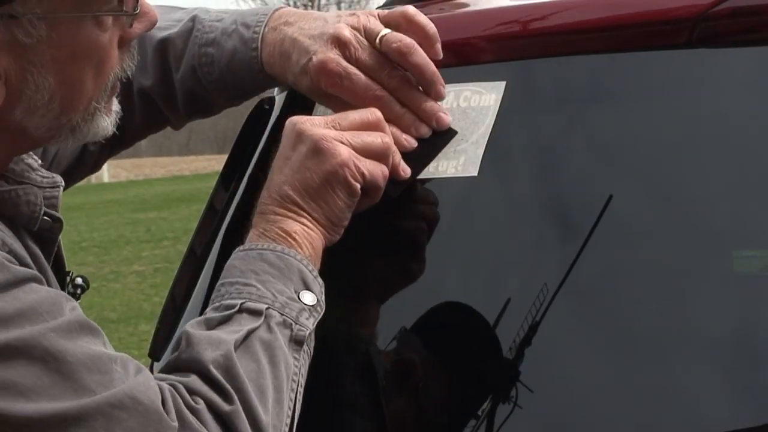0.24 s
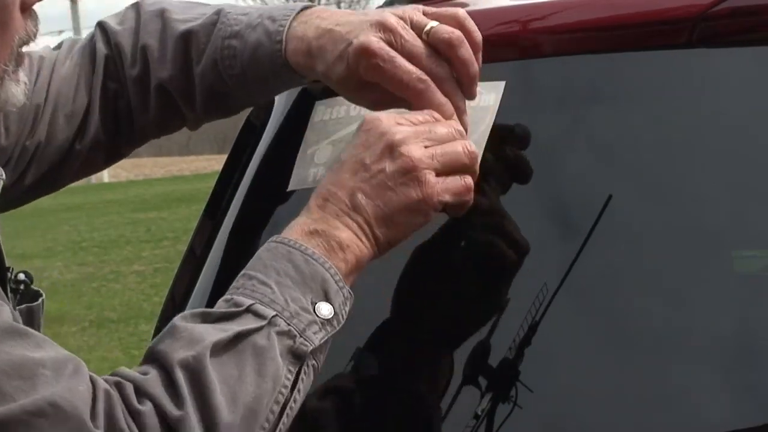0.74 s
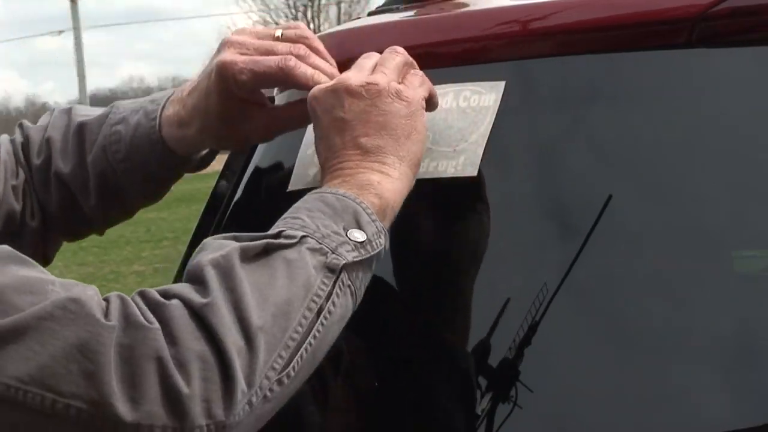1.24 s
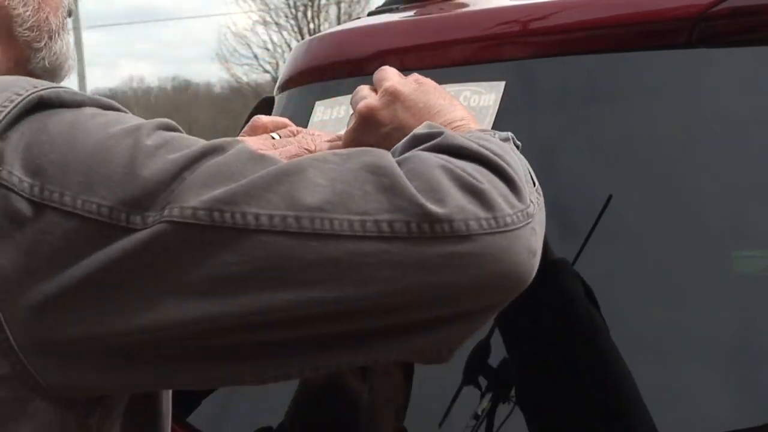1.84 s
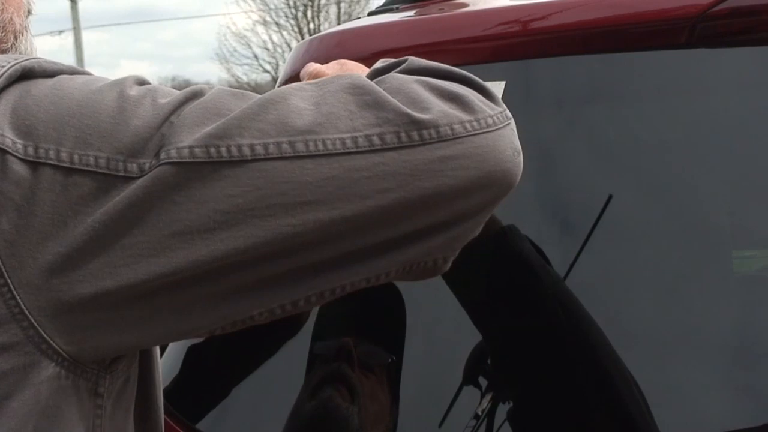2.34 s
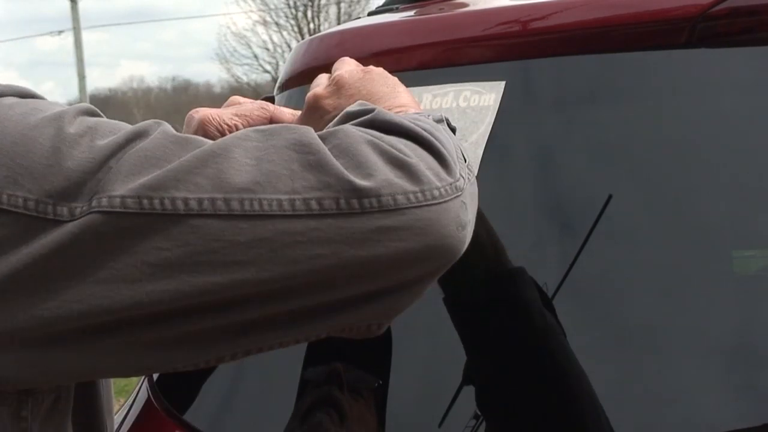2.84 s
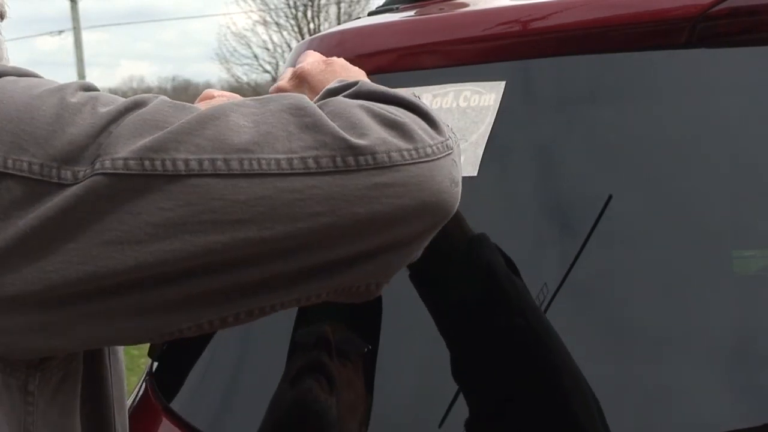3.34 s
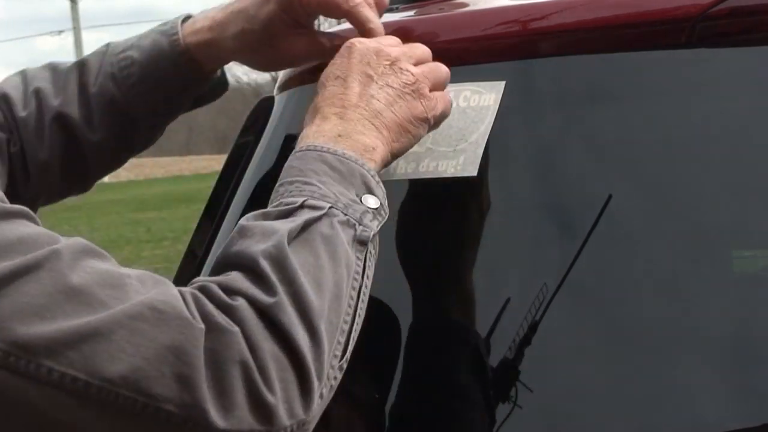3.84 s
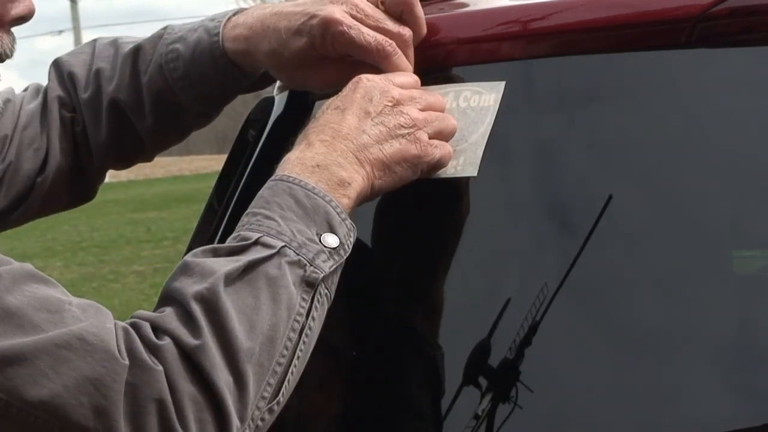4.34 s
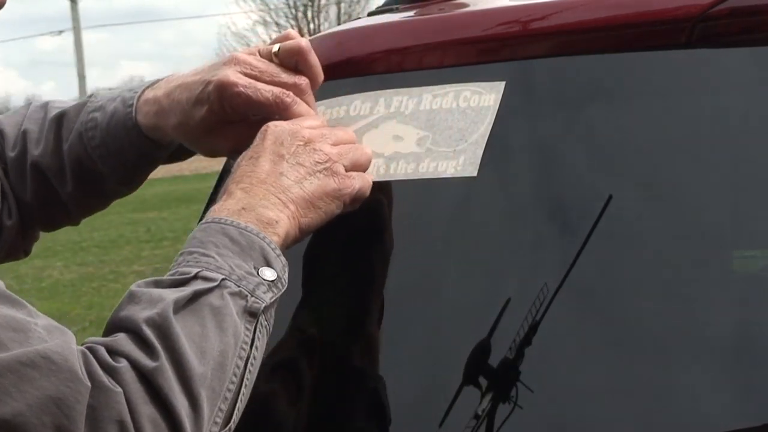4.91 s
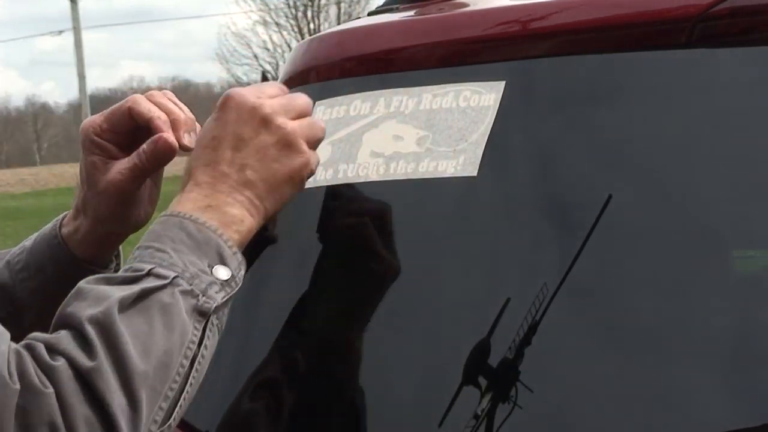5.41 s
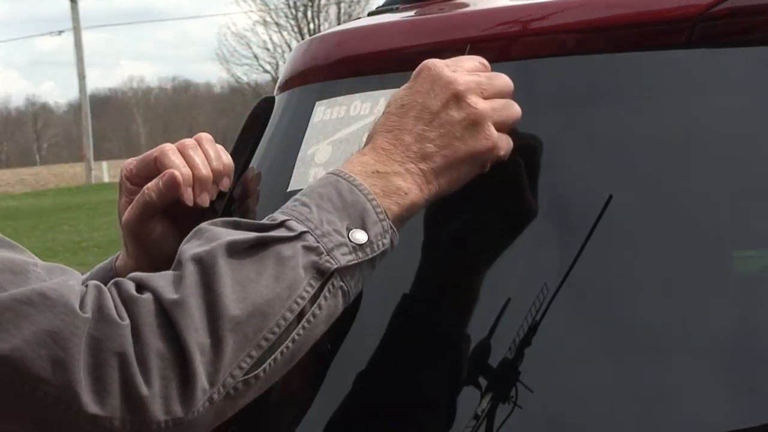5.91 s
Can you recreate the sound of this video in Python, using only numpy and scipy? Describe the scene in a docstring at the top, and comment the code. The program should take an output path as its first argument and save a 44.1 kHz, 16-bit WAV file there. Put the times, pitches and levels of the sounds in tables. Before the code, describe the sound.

Close, dry rubbing of a hard blade on a car window, with sleeve rustles, knocks, and a final harsh rasp and thud.

```python
"""Smoothing a decal onto a car window

A plastic squeegee smooths a vinyl decal onto a car's rear window, outdoors on a calm day.
The blade sticks and slips: random bursts of tiny pushes drum the pane, and finer grains make the edge hiss.
Sleeves and fingers brush between strokes, as noise that swells and fades. The blade is set down with knocks.
One last hard stroke crackles across the decal in coarse grains and snaps off its edge.
"""
import sys
import numpy as np
from scipy import signal
from scipy.fft import rfft, irfft
from scipy.io import wavfile
from scipy.ndimage import uniform_filter1d, minimum_filter1d, map_coordinates

SR = 44100
rng = np.random.default_rng(int(sys.argv[2]) if len(sys.argv) > 2 else 0)


def dump_mix(stems):
    """Bounce the given channels to the path in sys.argv[1] as a 16-bit WAV at rate SR."""
    frames = np.atleast_2d(stems).T  # one column per channel
    limited = np.clip(frames, -1, 1)  # hard clip at full scale
    pcm = np.round(limited * 32767).astype(np.int16)
    wavfile.write(sys.argv[1], SR, pcm)


N = 271876

TIME = np.arange(N) / SR  # seconds
TAPS = 8192  # length of each impulse response, in samples
BINS = np.maximum(np.arange(TAPS // 2 + 1) * SR / TAPS, 1)  # frequencies of a gain curve, in Hz

# Levels in the tables are relative: the functions that play them set the final balance.


# the first, slow stroke: [t/s, pane drumming level/dB, edge hiss level/dB, fine treble hiss level/dB]
FIRST_STROKE = [(0.06, -48, -55, -68), (0.122, -28, -51, -61), (0.152, -38, -50, -61),
                (0.214, -23, -48, -59), (0.24, -31.5, -48, -60), (0.32, -19.5, -43.5, -54),
                (0.362, -26, -50.5, -60), (0.57, -28.5, -45, -52), (0.598, -32.5, -59, -71),
                (0.66, -48, -62, -73)]
# colour of its edge hiss: [f/Hz, level/dB]
FIRST_EDGE = [(310, -38), (520, 2.5), (595, -5.5), (622, -14), (831, -8), (1040, -18), (1120, -16.5),
              (1420, -17.5), (2220, -19.5), (2680, -19), (3800, -25), (5550, -24), (7500, -34.5),
              (9750, -62), (16500, -120)]


def first_stroke():
    """The slow opening stroke, with the pane's higher modes held back."""
    return smoothing(FIRST_STROKE, FIRST_EDGE, tilt_db=-6.5, rumble_db=-22)


# quick strokes with the elbow raised: [start t/s, length t/s, pane drumming level/dB,
# edge hiss level/dB, fine treble hiss level/dB, lifted band of the edge hiss f/Hz]
SHORT_STROKES = [(1.772, 0.29, -33, -48, -64.5, 3600), (2.068, 0.17, -29, -44, -59, 2480),
                 (2.245, 0.34, -29.5, -45, -57, 4700), (3.019, 0.15, -31, -46.5, -60, 4600),
                 (3.18, 0.14, -32.5, -49.5, -60.5, 4600), (3.335, 0.15, -34.5, -52.5, -66, 3200),
                 (3.462, 0.16, -35, -52.5, -67, 3270)]
# colour of their edge hiss: [f/Hz, level/dB]
SHORT_EDGE = [(530, -30), (900, 0), (983, 4.5), (1070, -6), (1240, 0), (1590, -4.5), (2020, -7.5),
              (2300, 0.5), (2680, -6.5), (4030, -6.5), (5260, -10.5), (6570, -20.5), (7500, -24),
              (9750, -34), (16500, -120)]
# time to build pressure, its slow sag, time to let go
PRESS_S, SAG_DB_PER_S, LIFT_S = 0.049, 8.5, 0.062


def quick_strokes():
    """Drumming, rumble and hiss of a quick stroke all follow one press, sag and lift."""
    pane_sound = judder(1, undb(-11.5), tilt_db=7)
    treble = vinyl_hiss(hz=8500, lift=0.54)
    out = 0
    for s, length, drum_db, hiss_db, fine_db, hz in SHORT_STROKES:
        age = np.clip(TIME - s, 0, length)
        press_and_lift = np.minimum(np.minimum(age / PRESS_S, (length - age) / LIFT_S), 1)
        pressure = press_and_lift ** 1.07 * undb(-SAG_DB_PER_S * age)
        lifted_band = 1 + 0.46 * resonances([(hz, 1100, 0)])
        edge = edge_hiss(colour(SHORT_EDGE) * lifted_band)
        stroke = undb(drum_db) * pane_sound + undb(hiss_db) * edge + undb(fine_db) * treble
        out = out + pressure * stroke
    return out


# the long stroke out to the side: [t/s, pane drumming level/dB, edge hiss level/dB, fine treble hiss level/dB]
LONG_STROKE = [(4.245, -45, -57, -75), (4.279, -23, -37, -50.5), (4.339, -37, -52, -70),
               (4.371, -20, -33, -50.5), (4.425, -25, -47, -60), (4.533, -34, -50, -65),
               (4.623, -16.5, -38, -51), (4.701, -25, -47, -60), (4.807, -18, -42, -54),
               (4.907, -32.5, -54, -69), (4.941, -24, -45, -56), (5.023, -31.5, -49, -63),
               (5.067, -28, -55.5, -68), (5.12, -45, -62, -75)]
# colour of its edge hiss: [f/Hz, level/dB]
LONG_EDGE = [(350, -21), (600, -23), (646, -10), (711, 0), (916, -10), (1130, -10.5), (1590, -18),
             (1920, -14.5), (2200, -8.5), (2470, -9.5), (3020, -19.5), (3220, -16), (3500, -18),
             (5400, -21), (7500, -34.5), (9750, -61), (16500, -120)]


def long_stroke():
    """The long stroke out to the side, with more of the pane's higher modes than the first."""
    return smoothing(LONG_STROKE, LONG_EDGE, tilt_db=-2.0, rumble_db=-19.5)


# the last hard stroke: [t/s, pane drumming level/dB, edge rasp level/dB, fine treble hiss level/dB]
HARD_STROKE = [(5.685, -25.5, -39, -54), (5.743, -31.5, -36.5, -46), (5.777, -26, -24.5, -32),
               (5.803, -27, -24, -30.5), (5.843, -29.5, -33.5, -47.5), (5.905, -21, -22.5, -34),
               (6.009, -30, -38.5, -50), (6.031, -28, -36.5, -52), (6.049, -35, -27.5, -36),
               (6.066, -26.5, -26, -30)]
# resonances of the hard-pressed plastic blade: [f/Hz, width f/Hz, level/dB]
BLADE = [(658, 145, 0.5), (1094, 1020, -1.5), (1950, 530, -0.5), (2320, 490, -2), (3600, 1300, -6.5),
         (4370, 1040, -7), (5490, 1480, -10.5), (10100, 6400, -20)]


def scraping():
    """Pressed hard, the edge rasps in coarse grains that ring the plastic, with sharper cracks among them."""
    drum, hiss, fine = follow(HARD_STROKE)
    chatter = undb(2.4 * walk(rate=330))
    # two parts of the edge take turns in gripping, each with a slightly different stiffness
    grip = .5 + .5 * np.tanh(1.7 * walk(rate=30))
    rasp = 0
    for share, stiff in [(grip, .97), (1 - grip, 1.03)]:
        modes = [(hz * stiff, width, db) for hz, width, db in BLADE]
        rasp = rasp + np.sqrt(share) * ring(chatter * grains(rate=2600, spread_db=1.0), resonances(modes))
    cracks = ring(grains(rate=140, spread_db=2.5), resonances(BLADE))
    treble = ring(chatter * grains(rate=8000, spread_db=2.5), colour(FINE))
    surface = hiss * (undb(-3) * rasp + undb(-8) * cracks) + undb(-1.5) * fine * treble
    return judder(drum, undb(-16) * drum, tilt_db=3) + surface


def smoothing(stroke, edge_colour, tilt_db, rumble_db):
    """A slow stroke: edge and vinyl hiss, and the body's rumble follows the drumming of the pane."""
    drum, hiss, fine = follow(stroke)
    surface = undb(0.2) * hiss * edge_hiss(colour(edge_colour)) + fine * vinyl_hiss(hz=10200, lift=0.3)
    return judder(drum, undb(rumble_db) * drum, tilt_db) + surface


# resonances of the car body: [f/Hz, width f/Hz, level/dB]
BODY = [(43, 20, -3), (75, 43, 3.5), (135, 100, -16)]


def judder(drum, rumble, tilt_db):
    """Stick-slip of the blade comes in short bursts that drum the pane and shake the car body."""
    glass = even(ring(grains(rate=260, spread_db=3.0), pane(tilt_db)), seconds=0.015)
    bursts = unit(undb(2.2 * walk(rate=90)))
    body = even(ring(grains(rate=240, spread_db=4.5), resonances(BODY)), seconds=0.056)
    return undb(-0.5) * drum * bursts * glass + undb(1.0) * rumble * body


# resonances of the window pane: [f/Hz, width f/Hz, level/dB]
PANE = [(154, 17.6, -11), (229.6, 50.3, 1.5), (264.7, 63, -3.5), (321, 118, -10), (361.6, 62, -9.5),
        (438.4, 79, -15), (677, 330, -28), (1140, 410, -67)]


def pane(tilt_db):
    """Gain of the pane; where it is touched favours lower or higher modes (dB per octave, up to 350 Hz)."""
    return resonances([(hz, width, db + tilt_db * np.log2(min(hz, 350))) for hz, width, db in PANE])


def edge_hiss(gain):
    """Fine grains hiss from the gliding edge with a random flutter; rms 1 from 1.5 to 6 kHz."""
    flutter = undb(0.93 * walk(rate=120))
    direct = ring(flutter * grains(rate=9000, spread_db=1.5), gain)
    edge = reflect(direct, share=0.33, lag=0.000691, drift=0.13)
    band = signal.butter(4, [1500, 6000], "band", fs=SR, output="sos")
    return edge / signal.sosfilt(band, edge).std()


def reflect(x, share, lag, drift):
    """The hand over the blade throws the hiss back; as it moves, the bands of colour glide."""
    late = np.arange(N) - SR * lag * np.exp(drift * walk(rate=6))
    return unit(x + share * map_coordinates(x, [late], order=3))


# colour of the finest vinyl hiss: [f/Hz, level/dB]
FINE = [(6000, -29), (7400, -8.5), (8700, 1), (10300, -1), (12000, -2.5), (15300, -11.5)]


def vinyl_hiss(hz, lift):
    """The finest hiss of the vinyl, made of dense grains and lifted around hz."""
    flutter = undb(1.0 * walk(rate=150))
    gain = colour(FINE) * (1 + lift * resonances([(hz, 1400, 0)]))
    return ring(flutter * grains(rate=10000, spread_db=2.5), gain)


# the blade catches and lets go: [t/s, pane peak level/dB]
SLIPS = [(0.118, -20), (0.201, -13), (0.279, -12), (0.311, -9), (0.319, -8), (0.342, -14), (0.583, -20.5),
         (1.844, -19.5), (2.145, -13), (2.267, -16), (2.312, -18), (2.395, -9.5), (2.42, -19), (2.443, -17),
         (2.477, -13), (2.512, -13.5), (3.101, -21), (3.237, -16), (3.5, -23), (4.393, -10.5), (4.62, -13),
         (4.668, -10), (4.682, -16), (4.752, -10), (4.808, -5.5), (4.938, -10.5)]
# the blade is set down on the glass:
# [t/s, slap peak level/dB, pane peak level/dB, slap centre f/Hz, swell time of the slap's crunch t/s]
KNOCKS = [(1.4719, -20.5, -20.5, 657, 0.0016), (2.9058, -31, -28, 640, 0.0008),
          (4.0399, -14, -24, 417, 0.0011), (4.044, -15, -17.5, 1310, 0.0029),
          (5.295, -35, -30.5, 900, 0.0018), (5.6509, 4.5, -5, 1580, 0.00057)]


def pane_blows():
    """Big slips and landings ring the pane; a landing also slaps the blade flat on the glass."""
    out = np.zeros(N)
    for s, db in SLIPS:
        dulled_pane = pane(tilt_db=0) * colour([(400, 0), (800, -8)])
        add(out, s, undb(db - 2.5) * blow(dulled_pane, crunch=.3, seconds=.003))
    for s, slap_db, pane_db, hz, seconds in KNOCKS:
        add(out, s, undb(pane_db) * blow(pane(tilt_db=-3), crunch=0.77, seconds=0.0041))
        add(out, s, undb(slap_db) * blow(resonances([(hz, 1.06 * hz, 0)]), crunch=2.9, seconds=seconds))
    return out


# the hard edge clicks on the vinyl: [t/s, peak level/dB, treble lift at 8 kHz level/dB]
TICKS = [(0.7485, -33, 1), (0.817, -34, -3), (0.9164, -32, -16), (1.024, -27.5, 1), (1.5305, -19.5, 3.5),
         (1.6164, -36, 1), (4.046, -19.5, 7), (4.0547, -14.5, 6.5), (4.0635, -16.5, -10), (4.141, -38, -1),
         (5.2953, -27.5, 5), (5.6729, -20, 5), (5.7713, -5, -2), (5.8813, -11, -16), (5.8984, -7, -7),
         (5.904, -7, -7), (5.9173, -7.5, -1), (5.9355, -8, 3), (5.9485, -10, 4), (5.967, -12.5, -3),
         (5.9791, -10, 1), (6.013, -17, -7), (6.046, -9, -9), (6.072, 0.5, 6), (6.0812, -2.5, -4)]


def ticks():
    """The edge snaps over ridges of the decal; the glass answers faintly."""
    out = np.zeros(N)
    for s, db, treble_db in TICKS:
        tilt = colour([(600, -0.5), (2500, -0.047), (8000, treble_db)])
        add(out, s, undb(db) * blow(resonances(BLADE) * tilt, crunch=10, seconds=0.00054))
        add(out, s, undb(db - 16) * blow(pane(tilt_db=6.5), crunch=0.51, seconds=0.0026))
    return out


def snap_off(s, db):
    """The blade shoots off the decal's end, and the hand behind it bumps the glass: a low thud."""
    out = np.zeros(N)
    low_modes = [(44, 33, 0.0), (103, 105, -1.0), (189, 140, -11)]
    add(out, s, undb(db) * blow(resonances(low_modes), crunch=0.23, seconds=0.003))
    return out


# the edge or a fingertip skids briefly: [start t/s, length t/s, level/dB, centre f/Hz]
SKIDS = [(0.912, 0.022, -51, 1200), (1.236, 0.015, -47, 1200), (1.482, 0.036, -43, 3100),
         (1.535, .06, -48, 1600), (1.608, 0.017, -42, 1170), (1.654, 0.021, -42, 1200),
         (2.665, 0.017, -53, 2550), (3.858, 0.23, -56, 2500), (4.053, 0.017, -30.5, 1550),
         (4.176, 0.092, -46, 1090), (5.156, 0.042, -45, 2830), (5.5, .2, -47, 2000), (5.54, .13, -55, 5500),
         (5.77, .05, -26, 2000)]


def skids():
    """Short gritty scuffs: sparse grains ring one broad resonance."""
    out = 0
    for s, length, db, hz in SKIDS:
        grit = ring(grains(rate=1300, spread_db=3.5), resonances([(hz, 0.7 * hz, 0)]))
        out = out + sweeps([(s, length, db)], power=.5) * grit
    return out


# dull thumps of the hands on the car: [t/s, peak level/dB]
THUMPS = [(1.473, -31), (1.845, -31), (2.395, -23), (2.509, -25), (3.238, -24), (3.39, -27.5), (3.746, -25),
          (3.781, -25.5), (3.82, -31), (4.032, -32), (4.143, -27.5)]


def thumps():
    """Soft, heavy contacts move the whole body panel."""
    out = np.zeros(N)
    for s, db in THUMPS:
        add(out, s, undb(db - 2.0) * blow(resonances(BODY), crunch=0.74, seconds=0.0011))
    return out


# the sleeve swishes as an arm moves: [start t/s, length t/s, level/dB]
SWISHES = [(-0.05, 0.12, -47), (0.6, 0.5, -57.5), (0.895, 0.049, -51.5), (1.11, 0.23, -53.5),
           (1.405, 0.13, -47), (1.49, 0.15, -47), (1.64, 0.16, -51), (3.8, 0.29, -60.5), (4.04, 0.21, -49),
           (5.11, 0.32, -51), (5.46, 0.31, -50)]
# colour of the sleeve cloth: [f/Hz, level/dB]
CLOTH = [(40, -2), (90, 2.5), (200, 8), (400, 7.5), (600, 1.5), (950, 2.5), (1700, -1.5), (3000, -10),
         (5000, -14.5), (8000, -22), (15000, -54)]
# fingertips skim the vinyl: [start t/s, length t/s, level/dB]
BRUSHES = [(-0.02, 0.06, -58), (0.72, 0.076, -63), (0.865, 0.073, -63), (1.11, 0.11, -63.5),
           (1.465, 0.08, -57.5), (2.655, 0.032, -64), (2.825, 0.04, -65), (3.63, 0.034, -60.5),
           (3.74, 0.11, -59), (3.95, 0.086, -63.5), (5.17, 0.047, -55.5), (5.225, 0.027, -60.5),
           (5.34, 0.045, -52.5)]
# colour of skin sliding on vinyl: [f/Hz, level/dB]
SKIM = [(1500, -12), (3000, 7.5), (5500, 1.5), (7200, -5), (9500, -0.5), (12000, -5), (15300, -10)]


def arms():
    """Cloth rubs on cloth with a trace of fine hiss, and fingertips skim the vinyl."""
    sleeve = sweeps(SWISHES, power=0.35)
    fingers = sweeps(BRUSHES, power=0.8)
    cloth = ring(undb(1.7 * walk(rate=66)) * grains(rate=5000, spread_db=0.5), colour(CLOTH))
    skim = ring(grains(rate=9000, spread_db=4.5), colour(SKIM))
    return undb(3) * sleeve * cloth + (undb(5.5) * fingers + undb(-17.5) * sleeve) * skim


# colour of the outdoor air: [f/Hz, level/dB]
AIR = [(18, -28), (30, -2.5), (216, 1), (645, -11.5), (859, -9), (1090, -13), (2920, -18), (5440, -25.5),
       (7240, -31), (9390, -31.5), (15000, -40)]


def open_air():
    """Faint outdoor hush: coloured noise that wavers a little."""
    wavering = rng.standard_normal(N) * undb(0.81 * walk(rate=4.41))
    return undb(-50.5) * ring(wavering, colour(AIR))


def scatter(x, db, decay):
    """Brief reflections from the car, the arms and the ground: a decaying noise tail without bass."""
    t = np.arange(TAPS) / SR
    tail = rng.standard_normal(TAPS) * np.exp(-t / decay) * (t > .002)
    tail = signal.sosfilt(signal.butter(2, 600, "high", fs=SR, output="sos"), tail)
    return x + undb(db) * signal.fftconvolve(x, tail / np.linalg.norm(tail))[:N]


def follow(stroke, fade=0.021):
    """One gain curve for each dB column of a stroke, fading to silence before and after it."""
    s, *columns = np.transpose(stroke)
    contact = np.clip(np.minimum(TIME - s[0], s[-1] - TIME) / fade + 1, 0, 1)
    return [contact * undb(np.interp(TIME, s, db)) for db in columns]


def sweeps(moves, power):
    """Gain of light hand movements: each speeds up and slows down in one arch."""
    out = 0
    for s, length, db in moves:
        progress = np.clip((TIME - s) / length, 0, 1)
        out = out + undb(db) * np.abs(np.sin(np.pi * progress)) ** power
    return out


def grains(rate, spread_db):
    """Tiny releases of a rough contact, at random moments (rate per second) and of uneven size."""
    size = undb(spread_db * np.minimum(rng.exponential(size=N), 4))
    return (rng.random(N) < rate / SR) * size * rng.choice([-1, 1], N)


def walk(rate):
    """Smooth random wandering at rms 1, from so many fresh values per second."""
    k = int(SR / rate)
    steps = np.repeat(rng.standard_normal(N // k + 1), k)
    return unit(uniform_filter1d(uniform_filter1d(steps, k), k)[:N])


def even(x, seconds):
    """Hold a vibration near rms 1: steady hand pressure feeds it as fast as it dies."""
    k = int(seconds * SR)
    power = uniform_filter1d(uniform_filter1d(x ** 2, k), k)
    return x / np.sqrt(power + 1e-3)


def blow(gain, crunch, seconds):
    """One blow, peak 1: a clean push and a crunch of the contact that swells and dies."""
    t = np.arange(TAPS) / SR
    contact = rng.standard_normal(TAPS) * t * np.exp(-t / seconds)
    force = crunch * contact / np.linalg.norm(contact)
    force[0] += 1
    sound = signal.fftconvolve(force, causal(gain))[:TAPS]
    return sound / np.abs(sound).max()


def add(out, s, sound):
    """Mix a sound in at time s."""
    i = int(np.clip(s * SR, 0, N - 1))
    out[i:i + len(sound)] += sound[:N - i]


def ring(force, gain):
    """Sound of a body driven by a force, at rms 1."""
    return unit(signal.fftconvolve(force, causal(gain))[:N])


def causal(gain):
    """The most prompt impulse response with this shape of gain (minimum phase, by folding the cepstrum)."""
    cepstrum = irfft(np.log(gain / gain.max() + 1e-5))
    cepstrum[1:TAPS // 2] *= 2
    cepstrum[TAPS // 2 + 1:] = 0
    return irfft(np.exp(rfft(cepstrum)))


def resonances(modes):
    """Gain of overlapping steep resonances (Hz, width in Hz, dB), summed as powers."""
    power = 0
    for hz, width, db in modes:
        detuning = (BINS / hz - hz / BINS) * hz / width
        power = power + (undb(db) / (1 + detuning ** 2)) ** 2
    return np.sqrt(power)


def colour(points):
    """Gain through (Hz, dB) points."""
    hz, db = np.transpose(points)
    return undb(np.interp(np.log(BINS), np.log(hz), db))


def unit(x):
    """Scale to rms 1."""
    return x / np.sqrt(np.mean(x ** 2))


def undb(db):
    """Decibels to gain."""
    return 10 ** (np.asarray(db) / 20)


def scene():
    """All the work on the window, heard from close by."""
    strokes = first_stroke() + quick_strokes() + long_stroke() + scraping()
    contacts = pane_blows() + ticks() + snap_off(s=6.074, db=-2.5) + skids() + thumps()
    work = strokes + contacts + arms()
    return (scatter(work, db=-13.5, decay=0.012) + open_air())[None]


def record(dry):
    """A very fast limiter holds the loudest peaks down; the top is cut."""
    ceiling = .43  # highest amplitude that leaves the limiter
    need = ceiling / np.maximum(np.abs(dry), ceiling)
    gain = uniform_filter1d(minimum_filter1d(need, size=49), size=49)
    top_cut = signal.ellip(10, .2, 80, 15400, fs=SR, output="sos")
    return signal.sosfilt(top_cut, dry * gain)


dry = scene()
out = record(dry)
dump_mix(out)
```